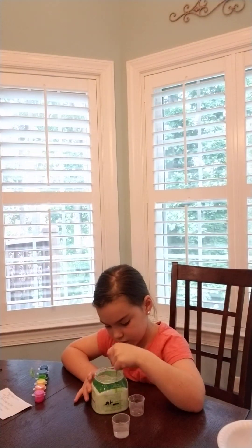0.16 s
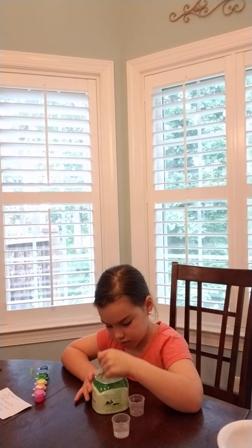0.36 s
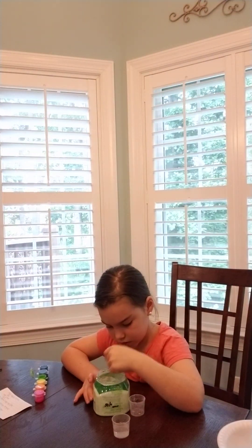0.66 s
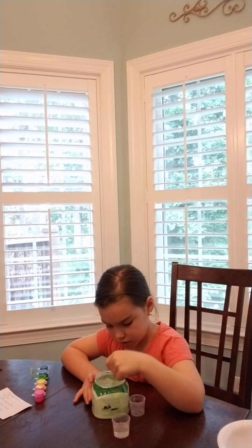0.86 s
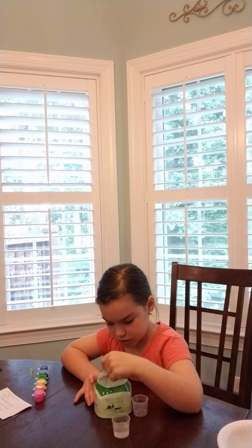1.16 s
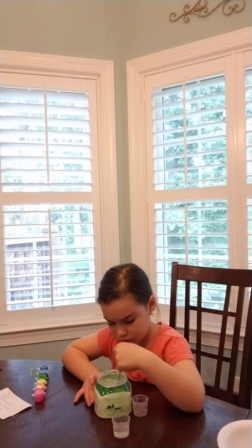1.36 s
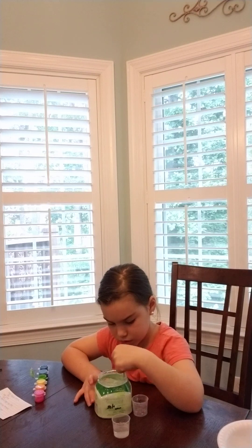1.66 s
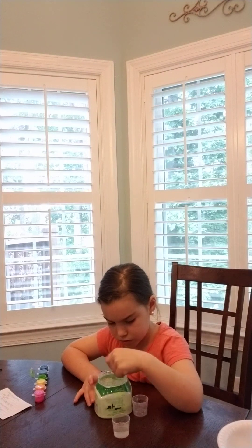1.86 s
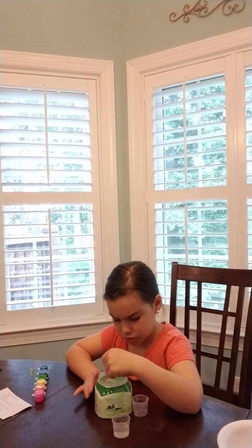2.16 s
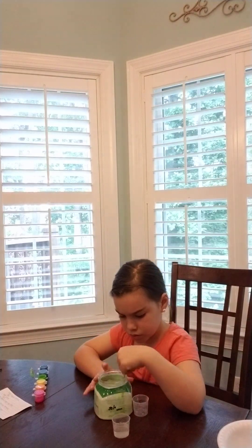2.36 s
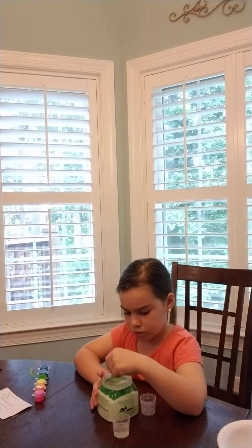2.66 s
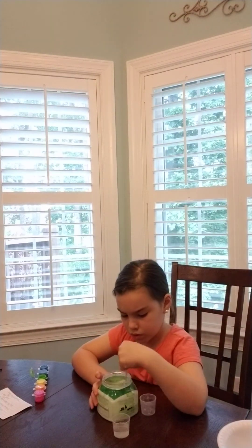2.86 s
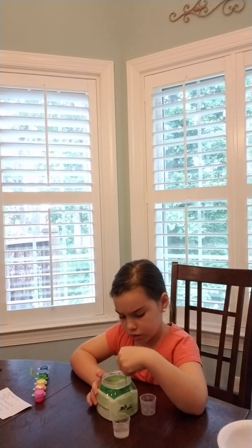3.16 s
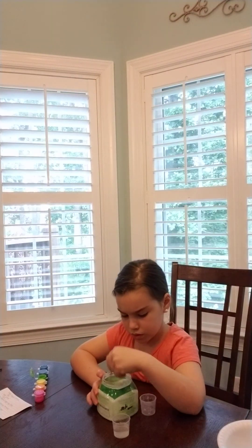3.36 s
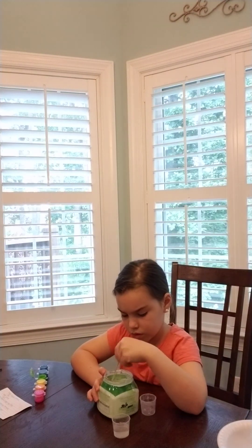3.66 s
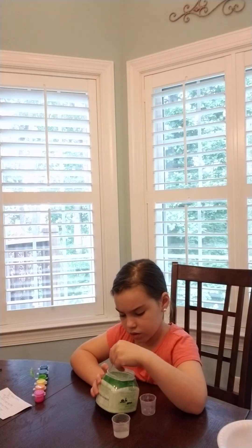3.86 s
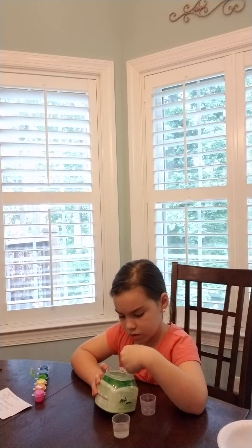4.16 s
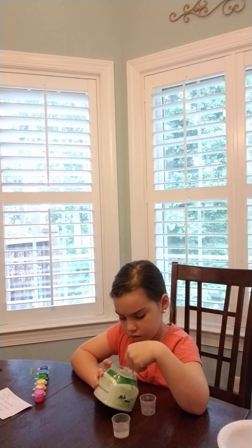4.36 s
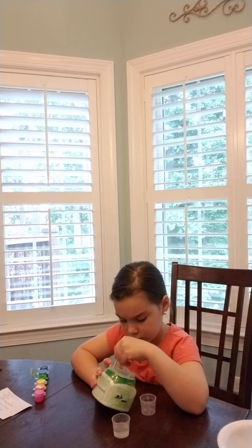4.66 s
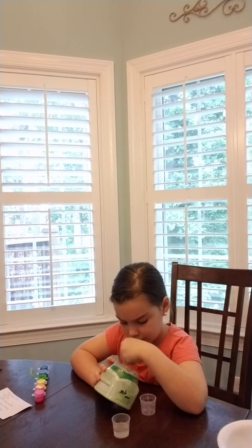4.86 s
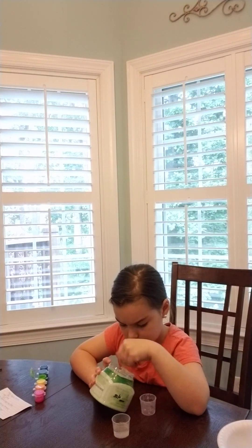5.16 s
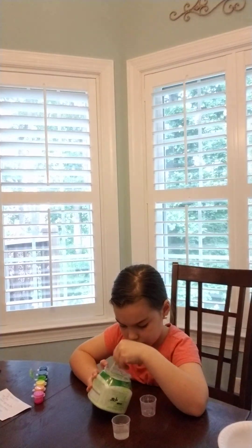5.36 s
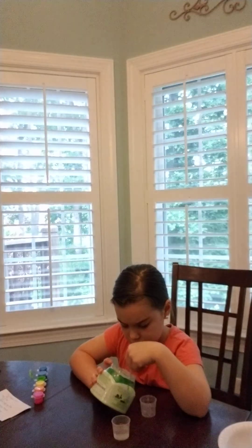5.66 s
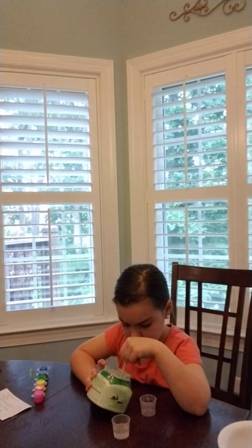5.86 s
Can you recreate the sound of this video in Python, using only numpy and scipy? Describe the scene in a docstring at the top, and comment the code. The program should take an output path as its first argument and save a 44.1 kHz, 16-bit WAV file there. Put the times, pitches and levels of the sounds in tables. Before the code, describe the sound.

A thin stick stirs sticky paste in a plastic tub, tapping the wall in quick irregular clusters with sharp ticks, small smacks and crackles. The base knocks and bumps dully on a wooden table. After about four seconds it becomes sparser and the taps narrower. Close stereo pickup in a small hard-walled room, with faint hiss and hum.

```python
"""Close stereo pair by a wooden table in a small hard-walled room: a thin stick stirs sticky paste in a plastic tub.
Hiss, faint hum and handling rumble (steady noise and sines) run throughout, under a murmur of random slips.
From the start the paste smacks and crackles (noise puffs, coloured grains) and the stick taps and ticks on the
wall (ringing modes, short grit); the base knocks and bumps on the table (table modes, slow low swells).
After four seconds the tub is tipped on its edge: its taps sound narrower and shiver on."""
import sys
import numpy as np
from scipy import signal
from scipy.fft import rfft, irfft
from scipy.io import wavfile

SR = 44100
rng = np.random.default_rng(int(sys.argv[2]) if len(sys.argv) > 2 else 0)


def log_audio(samples):
    """Write samples as a 16-bit WAV file to the path given in sys.argv[1]."""
    # one column per channel
    frames = np.atleast_2d(samples).T
    # limit to full scale, then quantise
    limited = np.clip(frames, -1, 1)
    pcm = np.round(limited * 32767).astype(np.int16)
    wavfile.write(sys.argv[1], SR, pcm)


N = 265041

# ringing modes of the wooden table top: hz, level_db, t60_s
TABLE_MODES = [(62, -28, 0.09), (81.5, -38, 0.11), (118.7, -12, 0.3), (166.3, 2, 0.05), (216.1, -4, 0.27),
               (255.2, -3.5, 0.11), (283.7, -2.5, 0.091), (343.7, -8.5, 0.066), (378, -4, 0.075),
               (418.2, -8.5, 0.16), (499, -6.5, 0.058), (529.6, -5.5, 0.14), (584, -4, 0.13),
               (698, -2.5, 0.058), (874, 10, 0.11)]
# ringing modes of the thin plastic tub wall: hz, level_db, t60_s
TUB_MODES = [(580, -13, 0.081), (658, -18, 0.061), (751, -10, 0.021), (828.3, 1.5, 0.057), (924, 3, 0.03),
             (1094, 2, 0.027), (1203, 5.5, 0.026), (1320, -1, 0.038), (1468, 3.5, 0.021),
             (1590, -0.5, 0.041), (1800, -1.5, 0.033), (2054, -4, 0.014), (2278, 1.5, 0.024),
             (2433, 0, 0.043), (2790, -32, 0.043), (2990, -14, 0.031)]


def amp(db):
    """Gain of a level in dB."""
    return 10 ** (np.asarray(db) / 20)


def rms_one(x):
    """Scaled to unit rms."""
    return x / np.sqrt(np.mean(x ** 2) + 1e-20)


def at_hz(points, hz):
    """Reads a table on a log-frequency axis."""
    table_hz, values = np.array(points)[:, 0], np.array(points)[:, 1]
    return np.interp(np.log(np.maximum(hz, 1)), np.log(table_hz), values)


def colour(x, spectrum):
    """Weights a sound by a spectrum in dB."""
    hz = np.fft.rfftfreq(x.shape[-1], 1 / SR)
    return irfft(rfft(x) * amp(at_hz(spectrum, hz)), x.shape[-1])


def band(x, low_hz, high_hz):
    """Causal band-pass."""
    return signal.sosfilt(signal.butter(2, [low_hz, high_hz], "band", fs=SR, output="sos"), x)


def ringing(modes, seconds):
    """One exponentially decaying sine per mode, one row each."""
    t = np.arange(int(seconds * SR)) / SR
    hz, db, t60 = np.transpose(modes)[:, :, None]
    return amp(db - 60 * t / t60) * np.sin(2 * np.pi * hz * t)


def add(track, sound, start_s, peak_db):
    """Lays a sound on the track from its start time, scaled to its peak level."""
    i = int(start_s * SR)
    scaled = amp(peak_db) * sound / np.abs(sound).max()
    track[i:i + len(sound)] += scaled[:N - i]


def swells(rows):
    """Gain over time: one bell-shaped swell per row of top_s, length_s, level_db."""
    t = np.arange(N) / SR
    return sum(amp(db - 9.7 * np.minimum((2 * (t - top_s) / length_s) ** 2, 20))
               for top_s, length_s, db in rows)


def diffuse(size):
    """Stereo noise arriving from all round, alike in the bass and nearly unrelated in the treble."""
    # left-right likeness of diffuse sound: hz, likeness (0 to 1)
    likeness = [(100, 0.51), (300, 0.76), (700, 0.073), (2000, 0.069), (15000, 0.024)]
    mid, side = rfft(rng.standard_normal((2, size)))
    alike = np.clip(at_hz(likeness, np.fft.rfftfreq(size, 1 / SR)), 0, 1)
    shared = np.sqrt((1 + alike) / 2) * mid
    opposed = np.sqrt((1 - alike) / 2) * side * [[1], [-1]]
    return irfft(shared + opposed, size)


def room_tone():
    """Steady microphone hiss and air noise with faint hum lines as pure sines."""
    # spectrum of the air and hiss, only its shape counts: hz, relative_db
    hiss_shape = [(15, -42), (25, -19), (118, 0), (146, -20), (238, -16), (273, -25), (339, -12.5),
                  (410, -23), (831, -17.5), (3700, -33.5), (5880, -30), (8600, -30), (12900, -20),
                  (15200, -21.5), (16500, -42)]
    # hum lines: hz, rms_db
    hum_lines = [(118, -82.5), (232, -81), (335, -92.5)]
    hiss_rms_db = -69
    t = np.arange(N) / SR
    hum = sum(np.sqrt(2) * amp(db) * np.sin(2 * np.pi * hz * t) for hz, db in hum_lines)
    return amp(hiss_rms_db) * rms_one(colour(diffuse(N), hiss_shape)) + hum


def handling():
    """Hands on the recorder: deep band-passed noise, separate in each channel."""
    rms_db, low_hz, high_hz = -69.5, 7.3, 50
    return amp(rms_db) * rms_one(band(rng.standard_normal((2, N)), low_hz, high_hz))


def grains(per_s, spread_db):
    """Stick-slip friction as impulses at random instants, of uneven size and either sign."""
    sizes = amp(spread_db * np.minimum(rng.exponential(1, N), 4)) * rng.choice([-1, 1], N)
    return sizes * (rng.random(N) < per_s / SR)


def stirring():
    """Dense slips set table and tub murmuring, while the paste crackles as it pulls apart."""
    # strokes of the stick, dragging the table and scraping the wall: top_s, length_s, drag_db, scrape_db
    sweeps = np.array([(0.038, 0.19, -59, -69), (0.58, 0.2, -49, -60), (.92, 0.37, -55, -63.5),
                       (1.365, 0.23, -56, -64), (1.63, 0.26, -58, -72), (2.434, 0.19, -56, -61),
                       (2.975, 0.54, -63.5, -77.5), (3.62, 0.088, -57, -64), (4.78, 0.052, -79, -69),
                       (4.965, 0.29, -73, -98), (5.234, 0.1, -63, -61), (5.496, .15, -75, -81)])
    # swells of crackle in the paste: top_s, length_s, level_db
    tears = [(.9, 0.28, -68), (1.36, 0.21, -77.5), (1.65, 0.27, -74.5), (2.3, 0.17, -67.5),
             (2.46, 0.1, -62), (2.95, 0.14, -73.5), (3.3, 0.33, -75), (4.78, 0.045, -66), (4.95, 0.38, -83),
             (5.75, 0.14, -75.5)]
    # spectrum of the crackle, only its shape counts: hz, relative_db
    crackle_shape = [(1200, -4), (2000, -26), (3500, -6), (5000, -3.5), (7000, -5), (9000, -8.5),
                     (12000, -11), (16000, -11)]
    table_rest_db, wall_against_table_db = -79, -15.5  # murmur between sweeps
    drag = swells(sweeps[:, [0, 1, 2]]) + amp(table_rest_db)
    scrape = swells(sweeps[:, [0, 1, 3]]) + amp(table_rest_db + wall_against_table_db)
    table_slips = band(grains(300.0, 2.8), 25, 250)
    table = signal.fftconvolve(table_slips, ringing(TABLE_MODES, .5).sum(0))[:N]
    wall = signal.fftconvolve(grains(600.0, 2.2), ringing(TUB_MODES, .1).sum(0))[:N]
    paste = colour(grains(4000.0, 3.8), crackle_shape)
    return drag * rms_one(table) + scrape * rms_one(wall) + swells(tears) * rms_one(paste)


def smacks():
    """Tearing paste gives puffs of top-octave noise that start at once and die within milliseconds."""
    # bright smacks: start_s, peak_db
    smack_events = [(.0199, -74), (0.039, -38), (.4274, -62), (0.5004, -40.5), (0.795, -60), (.8574, -49),
                    (.9847, -46), (1.5374, -43.5), (1.8961, -45), (2.2335, -49), (2.2648, -50),
                    (2.4064, -49), (2.6726, -41), (3.0165, -49), (3.369, -44), (3.615, -54),
                    (4.1888, -45.5), (4.7633, -42), (4.9492, -46), (4.966, -48), (5.402, -42.5),
                    (5.4125, -48)]
    decay_s = 0.0024
    out, t = np.zeros(N), np.arange(3000) / SR
    noises = rng.standard_normal((len(smack_events), len(t)))
    for (start_s, peak_db), white in zip(smack_events, noises):
        puff = white * (t + 0.0031) * np.exp(-t / decay_s)
        add(out, band(puff, 12500, 21600), start_s, peak_db)
    return out


def taps():
    """Where the stick lands decides which wall modes ring; the contact is a gritty few milliseconds."""
    # stick on the tub wall: start_s, peak_db, centre_hz of the modes it wakes
    tap_events = [(.021, -45, 805), (.039, -45.5, 790), (.09, -41, 830), (.23, -41, 1300),
                  (.255, -39, 1140), (.288, -47, 813), (.391, -36.5, 830), (0.429, -34.5, 1390),
                  (.504, -26.5, 660), (.631, -25, 1510), (0.692, -31.5, 1270), (.798, -31, 1260),
                  (.847, -39.5, 705), (0.957, -41, 834), (.985, -27.5, 680), (1.123, -38.5, 1510),
                  (1.318, -33, 980), (1.373, -35, 1350), (1.437, -27, 1080), (1.507, -25.5, 1400),
                  (1.536, -30, 900), (1.84, -33, 900), (1.897, -34, 1030), (2.237, -37.5, 845),
                  (2.261, -40, 640), (2.383, -49, 832), (2.464, -31.5, 1210), (2.496, -48, 816),
                  (2.677, -33, 880), (2.878, -43.5, 1090), (2.925, -41, 910), (3.017, -36, 1300),
                  (3.074, -44, 870), (3.228, -49.5, 820), (3.367, -33.5, 637), (3.419, -32, 860),
                  (3.477, -46, 721), (3.571, -36, 830), (3.709, -33.5, 970), (3.897, -53, 920),
                  (4.085, -59, 920), (4.139, -47.5, 850), (4.664, -60, 750), (4.77, -52, 2420),
                  (4.907, -57, 664), (5.072, -42, 730), (5.222, -36.5, 870), (5.417, -34.5, 864),
                  (5.651, -39.5, 770), (5.91, -58.5, 750)]
    fall_db, tipped_fall_db = 17, 24.5  # per octave away from the centre
    fall_limit_db = 19.0  # far modes are never wholly silent
    tipped_from_s = 4.0  # on its edge the tub sounds narrower
    shiver_db, shiver_decay_s = -23, 0.063
    wall_cut_hz = 610  # the taps carry little bass below this
    mode_hz, modes = np.array(TUB_MODES)[:, 0], ringing(TUB_MODES, .08)
    out, t = np.zeros(N), np.arange(9000) / SR
    luck = rng.standard_normal((len(tap_events), len(mode_hz) + len(t)))
    for (start_s, peak_db, centre_hz), draw in zip(tap_events, luck):
        tipped = start_s > tipped_from_s
        mode_luck, grit = draw[:len(mode_hz)], draw[len(mode_hz):]
        octaves_away = np.abs(np.log2(mode_hz / centre_hz))
        loss_db = (tipped_fall_db if tipped else fall_db) * octaves_away
        share = amp(-np.minimum(loss_db, fall_limit_db) + 0.55 * mode_luck)
        contact = (0.3 + grit) * t / 0.00091 * np.exp(-t / 0.00085)
        # once tipped, the tub shivers on after each tap
        shiver = tipped * amp(shiver_db) * band(grit * np.exp(-t / shiver_decay_s), 550, 858)
        wall = signal.fftconvolve(contact + shiver, share @ modes)
        add(out, band(wall, wall_cut_hz, 12000), start_s, peak_db)
    return out


def ticks():
    """The stick tip snaps, then leaves grit little over an octave wide that dies within milliseconds."""
    # sharp ticks of the stick tip: start_s, peak_db, centre_hz
    tick_events = [(.0397, -49, 5170), (0.0876, -39, 4000), (.271, -53, 4960), (.287, -51, 5250),
                   (.429, -36.5, 5900), (0.501, -41, 5130), (.632, -35, 4750), (0.7957, -34.5, 5560),
                   (.864, -42.5, 4440), (.9472, -47.5, 5230), (0.986, -44.5, 4100), (1.124, -49, 5100),
                   (1.254, -54.5, 5740), (1.377, -61, 4090), (1.435, -51, 3320), (1.51, -58, 3330),
                   (1.5382, -30, 4400), (1.84, -48.5, 3170), (1.8966, -33.5, 4260), (2.235, -44, 5770),
                   (2.381, -47, 5170), (2.401, -51, 4370), (2.6753, -40.5, 7500), (2.8778, -45, 4970),
                   (3.018, -48.5, 4320), (3.0754, -42.5, 4600), (3.2264, -57, 3840), (3.3668, -40.5, 3480),
                   (3.4158, -42, 4600), (3.616, -58, 6500), (3.709, -49.5, 3760), (3.8958, -57.5, 5130),
                   (4.086, -57.5, 5070), (4.139, -53.5, 6530), (4.49, -62, 5650), (4.747, -61, 5500),
                   (4.7627, -44, 6740), (5.0702, -50.5, 5670), (5.226, -54, 6530), (5.3892, -43, 4700),
                   (5.402, -42.5, 7250), (5.6525, -56.5, 3650), (5.777, -59, 4250)]
    decay_s = 0.0035
    snap = 4  # first instant, against the grit that follows
    out, t = np.zeros(N), np.arange(2000) / SR
    noises = rng.standard_normal((len(tick_events), len(t)))
    for (start_s, peak_db, hz), white in zip(tick_events, noises):
        contact = white * np.exp(-t / decay_s) + snap * (t == 0)
        add(out, band(contact, hz / 1.65, hz * 1.375), start_s, peak_db)
    return out


def knocks():
    """The base chatters on the table for a moment; the soft contact drives mainly its low modes."""
    # hard knocks of the base on the table: start_s, peak_db
    knock_events = [(.048, -46), (.253, -43), (.394, -42.5), (.503, -23), (.632, -29.5), (0.834, -31),
                    (.985, -19.5), (1.442, -53.5), (1.534, -43), (1.853, -47.5), (1.909, -42.5),
                    (2.255, -33), (2.495, -38.5), (2.911, -43.5), (3.088, -48.5), (3.367, -22.5),
                    (3.575, -45), (3.62, -50.5), (5.221, -45)]
    full_rise_s, full_knock_db, rise_share = 0.0014, -21, 0.69  # weaker knocks rise more slowly
    decay_s, rattle_s, contact_cut_hz = 0.059, 0.039, 446
    out, t = np.zeros(N), np.arange(6000) / SR
    body = ringing(TABLE_MODES, .5).sum(0)
    soft_contact = signal.butter(3, contact_cut_hz, fs=SR, output="sos")
    rattle_end = amp(-40 * np.clip(t / rattle_s - .7, 0, 9))
    noises = rng.standard_normal((len(knock_events), len(t)))
    for (start_s, peak_db), white in zip(knock_events, noises):
        rise_s = full_rise_s * amp(rise_share * (full_knock_db - peak_db))
        chatter = white * np.abs(white)  # squared size makes it spikier
        force = chatter * np.exp(-t / decay_s) * np.clip(t / rise_s, 0, 1) * rattle_end
        force = signal.sosfilt(soft_contact, force)
        add(out, signal.fftconvolve(band(force, 57, 4400), body), start_s, peak_db)
    return out


def bumps():
    """A low bending of the table: a few cycles rising a little in pitch, over a dull rumble, in a bell swell."""
    # soft bumps: top_s, peak_db, width_s
    bump_events = [(0.1, -46, 0.025), (.305, -39, 0.022), (0.441, -41.5, .089), (0.522, -30, 0.037),
                   (0.685, -34, 0.084), (1.026, -35, 0.087), (1.286, -34.5, 0.038), (1.37, -42.5, 0.15),
                   (1.463, -39.5, 0.038), (1.563, -39.5, .055), (1.764, -47.5, 0.029),
                   (1.886, -40.5, 0.068), (2.043, -38, 0.044), (2.131, -44, 0.036), (2.287, -39.5, 0.072),
                   (2.521, -46, 0.071), (2.944, -41, 0.093), (3.11, -45.5, 0.05), (3.401, -38.5, 0.045),
                   (3.618, -52, .08), (4.953, -52.5, 0.071), (5.207, -28.5, 0.042), (5.284, -43.5, 0.065),
                   (5.721, -55, .14)]
    middle_hz, spread_hz, thud_db = 114.5, 6.4, -10
    out, t = np.zeros(N), np.arange(-4000, 4000) / SR  # time from the top
    rumbles = rms_one(band(rng.standard_normal((len(bump_events), len(t))), 60.6, 108))
    luck = rng.uniform(-0.94, 1, (len(bump_events), 2))
    for (top_s, peak_db, width_s), (turn, spot), rumble in zip(bump_events, luck, rumbles):
        hz = middle_hz + spread_hz * spot
        cycles = turn + hz * t * (1 + 1.43 * np.clip(t, -width_s, width_s))
        wave = np.sin(2 * np.pi * cycles) + amp(thud_db) * rumble
        swell = amp(-12 * (2 * t / width_s) ** 2)
        add(out, wave * swell, top_s + t[0], peak_db)
    return out


def room(x):
    """Wall reflections as diffuse noise that dies band by band, setting in a few milliseconds late."""
    # reverberation time of the room: hz, t60_s
    room_t60 = [(100, 0.35), (400, 0.42), (1000, 0.51), (3000, 0.32), (7000, 0.38), (15000, 0.37)]
    # reflections against the sound sent into the room: hz, level_db
    room_level = [(100, 5.5), (400, 7), (1000, 6.5), (3000, 8), (7000, 7.5), (15000, 7)]
    delay_s, rise_s = .003, 0.0016
    t, tail = np.arange(SR * 3 // 4) / SR, 0
    edges = 50 * 2 ** np.arange(0, 8.6, .5)  # half-octave bands, Hz
    white = diffuse(len(t))
    for low, high in zip(edges, edges[1:]):
        hz = np.sqrt(low * high)
        fall = np.clip((t - delay_s) / rise_s, 0, 1) * amp(-60 * t / at_hz(room_t60, hz))
        level = amp(at_hz(room_level, hz)) / np.sqrt(np.sum(fall ** 2))
        tail = tail + band(white, low, high) * fall * level
    return signal.fftconvolve(x[None], tail, axes=1)[:, :N]


def scene():
    """Direct sound reaches the right microphone first; each group of sounds has its own reflections."""
    left_lag = 8  # samples
    parts = [taps(), ticks() + smacks(), knocks() + stirring()]
    tub = sum(parts) + bumps()
    late_tub = np.r_[np.zeros(left_lag), tub[:-left_lag]]
    direct = np.array([late_tub, tub])
    # the reflected bumps are drawn afresh, with their own phases and pitches
    reflections = sum(room(part) for part in parts) + amp(-5) * room(bumps())
    return direct + reflections + room_tone() + handling()


def record(dry):
    """The left microphone is brighter than the right; the deep bass rolls off and the top is cut."""
    # left microphone against right: hz, difference_db
    left_over_right = [(100, 0), (1000, .5), (2000, 2.5), (4000, 4.5), (8000, 3), (12000, 9)]
    bass_cut_hz, top_cut_hz = 50, 16600
    left_tilt = [(hz, db / 2) for hz, db in left_over_right]
    right_tilt = [(hz, -db) for hz, db in left_tilt]
    both = np.array([colour(dry[0], left_tilt), colour(dry[1], right_tilt)])
    both = signal.sosfilt(signal.butter(3, bass_cut_hz, "high", fs=SR, output="sos"), both)
    return signal.sosfilt(signal.cheby2(14, 60, top_cut_hz, fs=SR, output="sos"), both)


dry = scene()
out = record(dry)
log_audio(out)
```